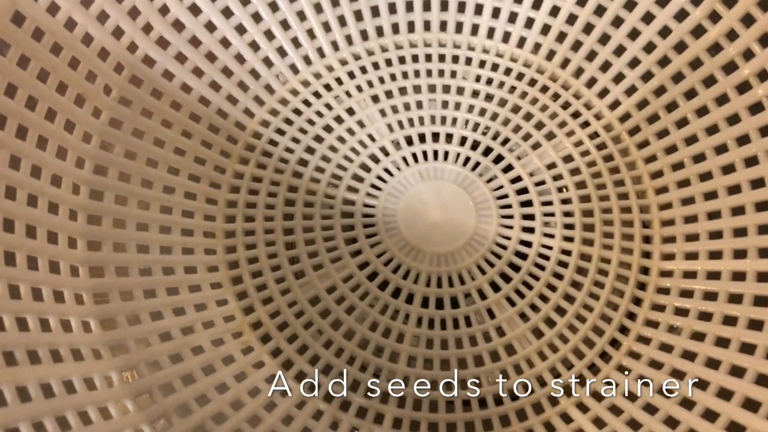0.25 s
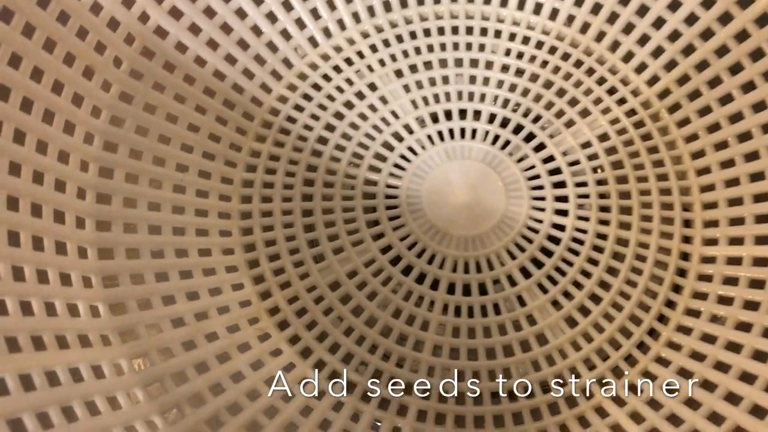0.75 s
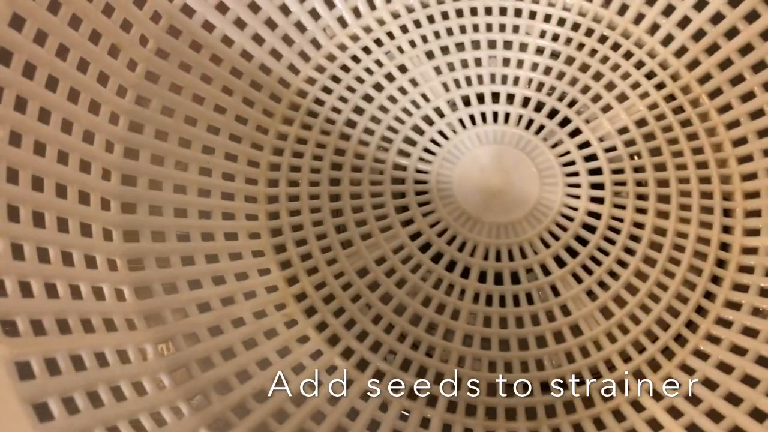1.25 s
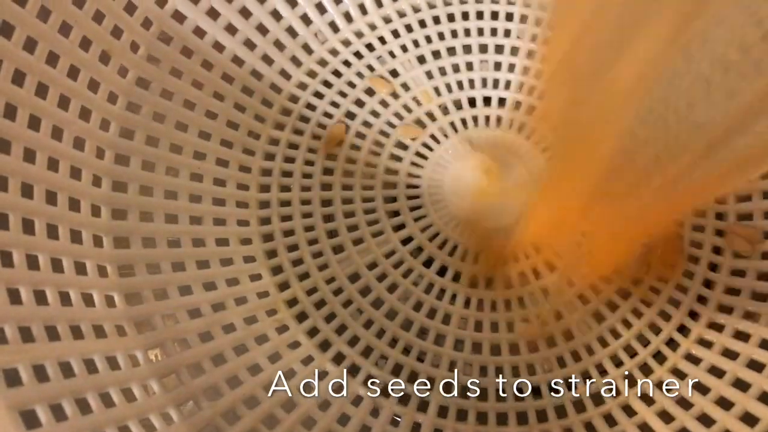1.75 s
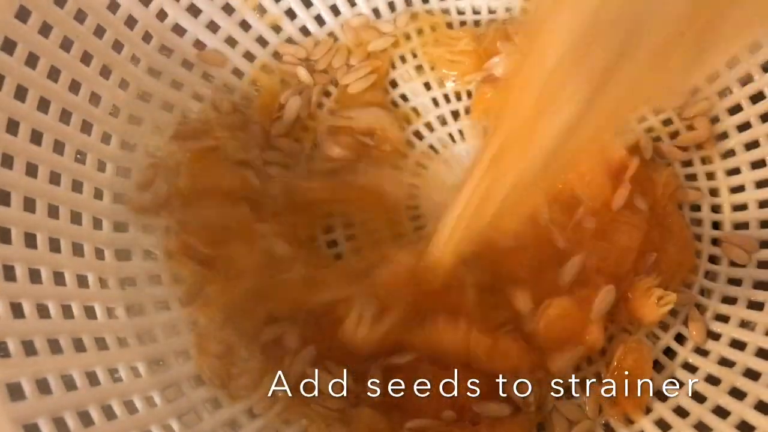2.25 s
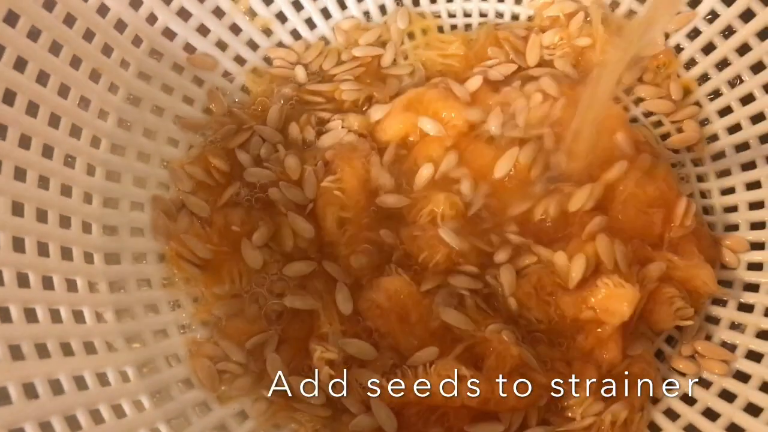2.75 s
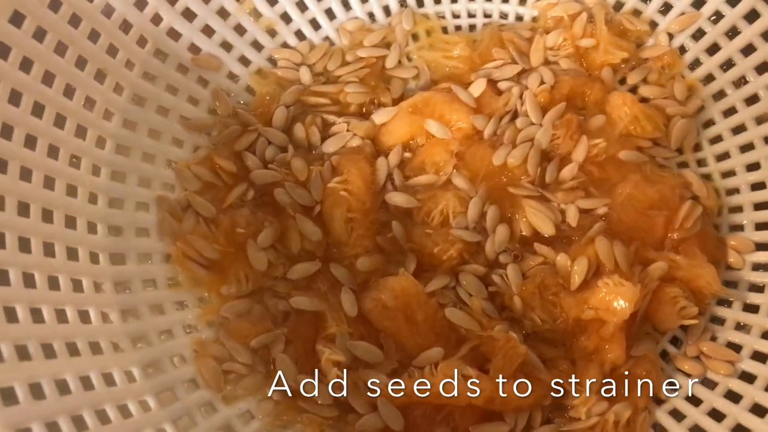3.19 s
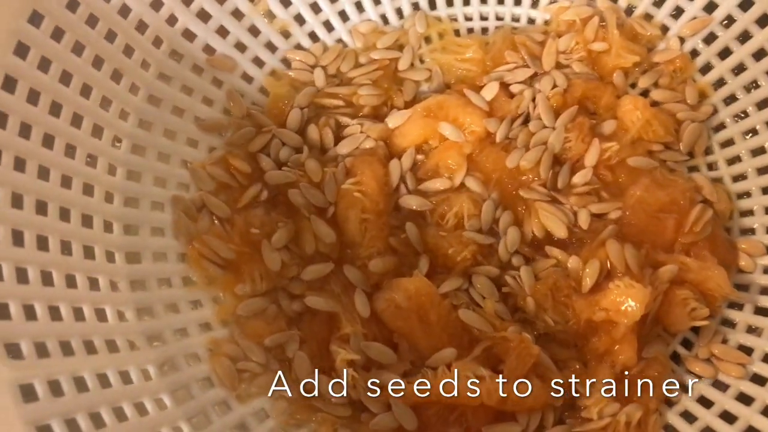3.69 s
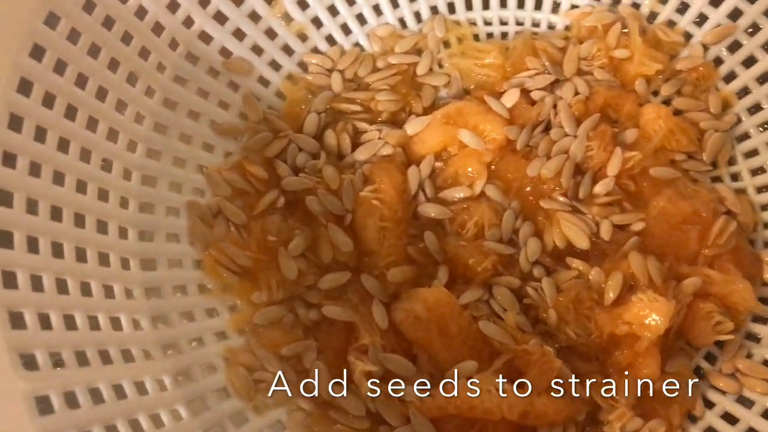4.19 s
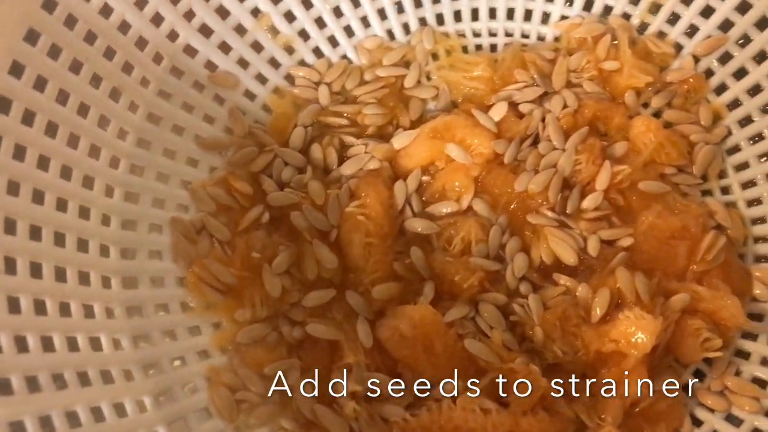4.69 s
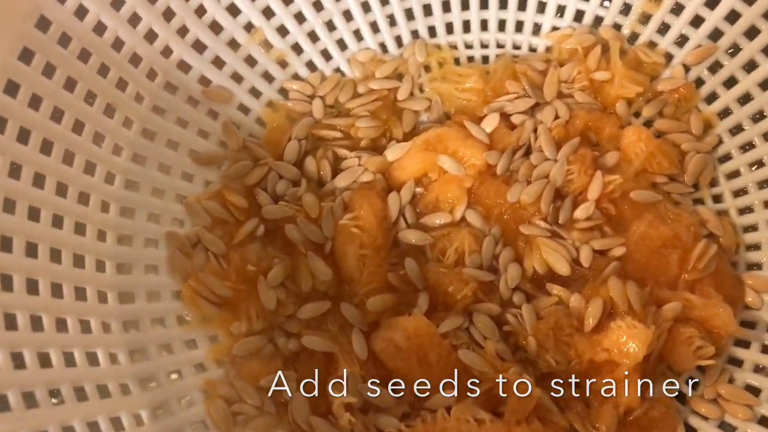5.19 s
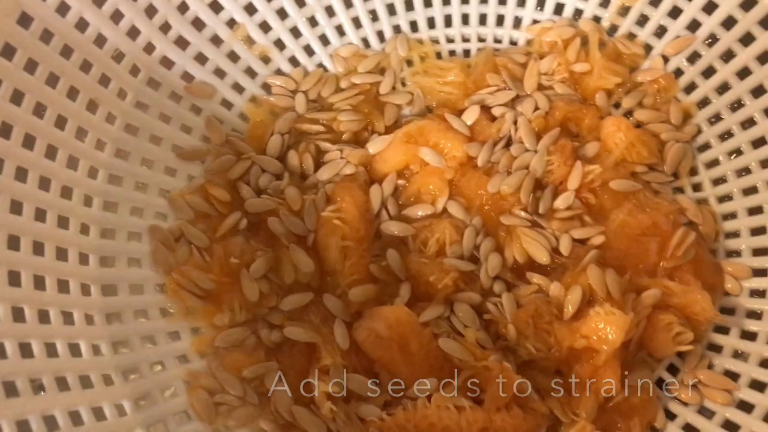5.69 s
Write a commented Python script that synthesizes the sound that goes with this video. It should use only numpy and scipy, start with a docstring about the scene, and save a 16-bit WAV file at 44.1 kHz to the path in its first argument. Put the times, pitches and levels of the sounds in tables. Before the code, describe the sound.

Close wet pour of pulp and seeds slopping into a strainer, draining to sparse ticking drips before loud clanks on a steel sink.

```python
"""At a steel kitchen sink, juice, pulp and seeds slop into a plastic strainer, close to the microphone.
Kitchenware bumps and slides on the sink before the pour and is set down hard after it: dying tones and noise.
The wet mass splats and crackles, made of noise bursts and tiny bubbles, over a gush and a low patter.
It thins out to drips, short dry noise bursts, in a quiet kitchen with soft air, a hum and a faint whine."""
import sys
import numpy as np
from scipy import signal
from scipy.fft import rfft, irfft
from scipy.io import wavfile
from scipy.ndimage import uniform_filter1d

SR = 44100
rng = np.random.default_rng(int(sys.argv[2]) if len(sys.argv) > 2 else 0)


def generate_wav(sig):
    """Save sig (samples, or channels by samples) to the path in sys.argv[1] as 16-bit PCM at SR."""
    pcm = np.round(np.clip(np.atleast_2d(sig).T, -1, 1) * 32767).astype(np.int16)
    wavfile.write(sys.argv[1], SR, pcm)


N = 261954
T = np.arange(N) / SR  # time of every sample, in seconds

# Levels in the tables are relative: the functions scale and filter them further.
# Colour of the room air: pitch_hz, level_db (per Hz)
AIR_COLOUR = [(25, -14.5), (45, 1.5), (70, -1), (115, 0.5), (160, -10), (280, -13.5), (450, -21.5),
              (1000, -22), (2000, -28), (8000, -34), (16000, -36.5)]
# Loudness of the hum over time: start_s, level_db
HUM_LEVEL = [(0, -59), (0.35, -61), (0.75, -59.5), (0.95, -80), (1.5, -69.5), (2, -78.5), (5.9, -60)]
# Blows on the sink: start_s, clack_db (bright), middle_db, boom_db (low), tick_db (contact)
KNOCKS = [(0.032, -48, -56, -39.5, -63), (0.051, -44, -50, -36.5, -53), (0.126, -46, -54, -43, -75),
          (0.19, -34.5, -45, -37, -49), (4.7056, -5.5, -28, -21, -22.5), (4.775, -19.5, -35, -28.5, -49),
          (5.0791, -24.5, -34.5, -27, -60), (5.1302, -37.5, -45, -38, -75),
          (5.226, -21.5, -19.5, -9.5, -36), (5.2692, -33.5, -32, -21, -50),
          (5.4232, -32.5, -41, -25.5, -82), (5.5923, -18, -23, -14, -27)]
# Ringing tones of the steel sink: pitch_hz, level_db, t60_s (time to fall by 60 dB)
SINK_MODES = [(92, -11.5, 0.093), (121.8, 3.5, 0.17), (140, -2.5, 0.072), (164.3, 3, 0.046),
              (228, -22, 0.62), (259, -17, 0.3), (278.5, -1, 0.32), (357.7, -14, 0.28), (400.5, -24, 0.8),
              (443, -2, 0.041), (523.3, -14.5, 0.31), (691, -4.5, 0.25), (745, -3.5, 0.29),
              (783, -22, 0.33), (853, -2.5, 0.1), (942, -7.5, 0.26), (1160, -12.5, 0.39),
              (1300, -19, 0.058), (1655, -24, 0.33), (1977, -2.5, 0.071), (3100, -11.5, 0.076),
              (3650, -15, 0.2), (6350, -61, 0.135)]
# Bright tones that a hard, metallic contact wakes: pitch_hz, level_db, t60_s
RIM_MODES = [(850, -26, 0.99), (1087, -19.5, .9), (1150, -23, 1), (1267, -7.5, 0.25), (1470, -11.5, 0.26),
             (1950, -20.5, 0.32), (2090, -16, .35), (2150, -25, 0.88), (3030, -26, 0.55),
             (3430, -20.5, 0.12), (3670, -18.5, 0.12), (4340, 1.5, 0.11), (4020, 13.5, 0.028),
             (4400, -24, 0.56), (6020, -18.5, 0.31), (6290, -4, 0.12), (7150, -26.5, 0.15),
             (8900, -4.5, 0.095)]
# Colour of the crowd of weaker sink tones: pitch_hz, level_db (per Hz)
CROWD_COLOUR = [(50, -74), (110, 9.5), (280, 5), (330, -19), (600, 4), (900, 8.5), (2000, -4),
                (4200, -17.5), (5200, -18), (9500, -25.5), (11000, -46), (16000, -23.5)]
# How long that crowd rings: pitch_hz, t60_s
CROWD_T60 = [(100, 0.58), (500, 0.38), (2000, 0.36), (5000, 0.18), (14000, 0.21)]
# Slides on the steel, one list for each: start_s, level_db
SLIDES = [
    [(0.02, -51), (0.05, -38.5), (0.12, -37.5), (0.16, -35), (0.195, -35), (0.24, -54)],
    [(5.33, -51), (5.44, -35.5), (5.5, -37), (5.58, -30.5), (5.62, -35)],
]
# Dull plops: start_s, level_db, pitch_factor (times), tick_db (relative to the plop)
PLOPS = [(0.8742, 2, 0.95, -21.5), (1.056, -27, 0.44, -36)]
# Tones of a plop before its pitch factor: pitch_hz, level_db, t60_s
PLOP_MODES = [(450, -7.5, 0.035), (130.7, -34, 0.13), (248, -16.5, .045), (359, -19, 0.025),
              (492.4, -25, 0.041), (564, -41, 0.16), (698, -16, 0.021), (1120, -35.5, 0.033)]
# Colour of a plop's dull echo: pitch_hz, level_db (per Hz)
PLOP_ECHO_COLOUR = [(100, -12), (350, -0.5), (600, 2), (800, -11), (1200, -17), (1900, -23.5), (2350, -18),
                    (3000, -34), (12000, -66.5)]
# The clearest drops through the mesh: start_s, level_db (peak), pitch_hz
DRIPS = [(3.381, -31.5, 522), (3.488, -28, 1690), (3.55, -31, 11200), (3.704, -32.5, 2070),
         (3.827, -33, 13250), (4.049, -33, 3600), (4.249, -36, 1160), (4.283, -34.5, 6070),
         (4.355, -32, 1630), (4.41, -31.5, 690), (4.639, -35.5, 3410), (5.018, -39, 1100),
         (5.876, -40, 745)]
# Colour of a drip: pitch_hz, level_db (per Hz)
DRIP_COLOUR = [(200, -11.5), (800, 3), (2000, 4), (4500, 3.5), (9000, -7.5), (16000, -1.5)]
# Time span in which fainter drops fall while the pulp drains: start_s, end_s
DRAIN_SPAN = (3, 5.6)
# Hollow notes of the bowl: pitch_hz, level_db, t60_s
BOWL_MODES = [(574, -3.5, 0.095), (868, -7.5, .09), (1138, 3.5, 0.23), (1216, -1, 0.36)]
# Strength of the pour, with swells and surges, then a trickle: start_s, level_db
FLOW = [(1.73, -10), (1.8, -7), (1.86, -7), (1.9, -4), (2.2, 1), (2.32, -4), (2.4, -6.5), (2.5, -5),
        (2.55, -11), (2.61, -5), (2.73, -13), (2.88, -8), (3.06, -21.5), (3.3, -22), (3.45, -27),
        (3.66, -36), (4.68, -41)]
# Heavy lumps landing on the strainer: start_s, level_db, pitch_hz
THUDS = [(1.731, -29.5, 255), (1.76, -27, 235), (1.824, -29.5, 215), (1.885, -22, 150), (1.92, -24.5, 110),
         (2.057, -33, 105), (3.115, -25, 260)]
# Colour of the seeds pattering and drumming on the bowl: pitch_hz, level_db (per Hz)
PATTER_COLOUR = [(50, -37.5), (95, 0.5), (150, -8.5), (185, -9.5), (260, -2), (300, -7.5), (350, -16),
                 (580, -15.5), (1500, -49)]
# Loudness of a soft clot sliding down: start_s, level_db
CLOT_LEVEL = [(3.715, -64), (3.738, -48), (3.745, -31), (3.762, -47.5), (3.8, -55), (3.85, -76)]
# Colour of the clot: pitch_hz, level_db (per Hz)
CLOT_COLOUR = [(50, -43.5), (130, -14), (280, 10.5), (400, -2.5), (620, 2.5), (1000, -13), (2200, -5),
               (5000, -14), (16000, -20.5)]
# Colour of the gushing liquid: pitch_hz, level_db (per Hz)
GUSH_COLOUR = [(300, -26.5), (450, -21), (580, -26), (700, -13.5), (900, -9), (1200, -6.5), (1430, -12.5),
               (1680, 0), (2800, -1), (3800, -4.5), (6000, -14)]
# Colour of the crackling seeds and films: pitch_hz, level_db (per Hz)
CRACKLE_COLOUR = [(1500, -10.5), (3000, -8), (4000, -2), (4900, -7), (6000, 1), (7500, -6), (9000, 0),
                  (10500, -10), (12500, -1), (16000, -14.5)]
# The biggest bursting pockets of air: start_s, level_db (peak), pitch_hz, t60_s
SPLATS = [(1.7303, -13, 9560, 0.13), (1.7587, 1.5, 3920, 0.017), (1.8687, -3, 6840, 0.038),
          (1.8823, -3, 2337, 0.064), (1.9396, 0, 2934, 0.053), (1.9594, 1.5, 3590, 0.049),
          (2.0396, -5.5, 4310, 0.034), (2.0986, -7.5, 4180, 0.021), (2.1934, -8, 6540, 0.023),
          (2.2551, -3, 5600, 0.019), (2.2872, -9, 3800, 0.01), (2.316, -5, 8970, 0.036),
          (2.3539, -0.5, 8960, 0.01), (2.4472, -8.5, 6730, 0.014), (2.5137, -8, 3230, 0.026),
          (2.563, -10.5, 6560, .02), (2.6, -7.5, 4500, 0.032), (2.6365, -6.5, 6640, 0.021),
          (2.835, -10.5, 6400, 0.0095), (2.8597, -8, 5550, 0.013), (2.8765, -5.5, 5980, 0.038),
          (2.9068, -5, 6330, 0.026), (2.9385, -10, 2565, 0.025), (2.9786, -14, 5900, .034),
          (3.0165, -12, 5820, 0.019), (3.0657, -18.5, 6500, 0.025), (3.1129, -12, 13500, .03),
          (3.1238, -13, 8160, 0.015), (3.1808, -5.5, 4130, .007), (3.2055, -12.5, 8770, 0.023)]
# Colour of a splat: pitch_hz, level_db (per Hz)
SPLAT_COLOUR = [(200, -24.5), (400, -32), (700, -1), (1150, -1.5), (1450, -5.5), (2500, -1.5), (7000, -2.5),
                (11000, -5.5), (16000, -8)]

EDGE_HZ = 16100  # upper limit of the microphone's range
AIR_DB = -62.5
# Each voice of the pour: level at 0 dB of flow, and dB lost for each dB less of flow
CRACKLE_DB, CRACKLE_SLOPE = -30, 1.015
GUSH_DB, GUSH_SLOPE = -30, 1.296
PATTER_DB, PATTER_SLOPE = -44, 0.57
DRUM_DB, DRUM_SLOPE = -44.5, 0.62
DRUM_HZ = 182  # the drumming lies below this pitch, the patter above it
GLUG_HZ, GLUG_DB = 6.5, 3  # the thick mass comes unevenly: fastest wavering, and its typical size
THUD_T60_S, THUD_PATTER_DB = 0.093, -15  # a lump dies away quickly; its seeds are quieter by this much
# Smaller pockets of air: how many, level at 0 dB of flow, its scatter, dB lost for each dB less of flow
POCKETS_PER_S, POCKET_DB, POCKET_SCATTER_DB, POCKET_SLOPE = 55, -12.5, 3, 0.5
# Their pitch at 0 dB of flow, its scatter, its rise as the flow thins, and their dying time
POCKET_HZ, POCKET_OCTAVES, POCKET_OCTAVES_PER_DB, POCKET_T60_S = 4360, 0.59, 0.06, 0.018
# Fainter drops: how many, level and its scatter, pitch and its scatter
DROPS_PER_S, DROP_DB, DROP_SCATTER_DB = 12, -43, 2.5
DROP_HZ, DROP_OCTAVES = 3456, 0.46
DRIP_T60_S = 0.019  # for clear and faint drops alike


def amp(db):
    """Turns decibels into a gain."""
    return 10 ** (np.asarray(db) / 20)


def unit(x):
    """Scales a sound to an average (rms) level of 1."""
    return x / np.sqrt(np.mean(x ** 2) + 1e-20)


def read(points, hz):
    """Reads a table between its points, with pitch spaced by ratio as we hear it."""
    f, value = np.transpose(points)
    return np.interp(np.log(hz + 1), np.log(f + 1), value)


def level(rows, column=1):
    """Turns a dB curve into a gain over time, practically silent outside its span."""
    rows = np.array(rows)
    return amp(np.interp(T, rows[:, 0], rows[:, column], left=-150, right=-150))


def add(mix, s, sound):
    """Mixes a sound in at time s."""
    part = mix[round(s * SR):][:len(sound)]
    part += sound[:len(part)]


def colour(x, points, size=4096):
    """Gives a sound the tone colour of a table, with no ringing ahead, so that clicks stay sharp."""
    log_gain = np.log(amp(read(points, abs(np.fft.fftfreq(size, 1 / SR)))))
    taps = np.fft.ifft(np.exp(np.conj(signal.hilbert(log_gain)))).real
    return signal.fftconvolve(x, taps[:size // 2])[:len(x)]


def band(x, kind, hz, order=3):
    """Keeps the lows, the highs or a band between two pitches."""
    return signal.sosfilt(signal.butter(order, hz, kind, fs=SR, output="sos"), x)


def dying(t, t60):
    """Dies away smoothly, falling by 60 dB in t60 seconds."""
    return np.exp(-np.log(1000) * t / max(abs(t60), 1e-4))


def ring(modes, t, pitch=1, split=0):
    """Sum of dying tones; an uneven shape splits each into a close pair that beats."""
    out = np.zeros(len(t))
    for k, (hz, db, t60) in enumerate(modes):
        turn = 2 * np.pi * hz * pitch * t
        twin = np.sin(turn * (1 + split * rng.standard_normal()))
        pair = (2 * np.sin(turn) + twin) / 3
        out += (-1) ** k * amp(db) * dying(t, t60) * pair
    return out


def diffuse(t60s, t, count=9):
    """Noise whose pitch bands die at their own speeds."""
    centres = np.geomspace(60, 15000, count)
    hz = np.fft.rfftfreq(len(t), 1 / SR)
    spectrum = rfft(rng.standard_normal(len(t)))
    out = np.zeros(len(t))
    for centre, share in zip(centres, np.eye(count)):
        one_band = irfft(spectrum * read(np.c_[centres, share], hz), len(t))
        out += one_band * dying(t, read(t60s, centre))
    return out


def clicks(per_s, spread_db):
    """Random clicks, mostly small and a few large."""
    place, size, side = rng.random((int(per_s * N / SR), 3)).T
    sizes = amp(spread_db * np.minimum(-np.log(1 - size), 4))
    return np.bincount((place * N).astype(int), sizes * np.sign(side - 0.5), N)


def steadied(x, size=2200):
    """Holds the short-term level near 1, leaving the fine grain."""
    power = uniform_filter1d(uniform_filter1d(x ** 2, size), size)
    return x / np.sqrt(abs(power) + 1e-12)


def moments(span, per_s, count=300):
    """Irregular moments through a span, each with two chance values: time, for its size, for its pitch."""
    times = span[0] + (np.arange(count) + rng.random(count)) / per_s
    chances = np.clip(rng.standard_normal((count, 2)), -2, 2)
    return np.c_[times, chances][times < span[1]]


def kitchen():
    """Soft room air, a low wavering hum and a very faint electrical whine."""
    air = amp(AIR_DB) * unit(colour(rng.standard_normal(N), AIR_COLOUR))
    waver = unit(band(rng.standard_normal(N), "low", 2.8, order=2))
    hum = level(HUM_LEVEL) * unit(np.sin(2 * np.pi * 62.8 * T + 0.37 * waver))
    whine = np.zeros(N)
    for k in range(2, 14):  # overtones of 1006.5 Hz, without the lowest one
        whine += np.sin(2 * np.pi * k * (1006.5 * T + rng.random())) / np.sqrt(k)
    return air + hum + amp(-80) * unit(whine)


def slides():
    """Something sticks and slips on the steel, and the clicks make the sink ring."""
    t = np.arange(SR // 2) / SR
    body = ring(SINK_MODES, t, split=0.02) + 2 * colour(diffuse(CROWD_T60, t), CROWD_COLOUR)
    # colour of the clicks: pitch_hz, level_db
    drive = colour(clicks(900, 6.2), [(100, 2), (300, 4.5), (450, -9.5), (700, -14.0), (1200, -12),
                                      (2000, -6.5), (5000, -5.5), (15000, -2)])
    scrape = steadied(signal.fftconvolve(drive, body)[:N])
    return scrape * sum(level(rows) for rows in SLIDES)


def sink():
    """Each blow ticks at the contact, rings the steel and booms the basin."""
    t, out = np.arange(SR * 3 // 5) / SR, np.zeros(N)
    early = slice(SR // 40)  # levels are set over this first part of the blow
    for s, clack_db, middle_db, boom_db, tick_db in KNOCKS:
        modes = ring(SINK_MODES, t, split=0.0175)
        rim = ring(RIM_MODES, t, split=0.0146)
        chatter = rng.standard_normal(len(t)) * dying(t, 0.083)
        crowd = colour(diffuse(CROWD_T60, t) + amp(15.5) * chatter, CROWD_COLOUR)
        body = modes + amp(-3) * crowd
        boom = band(body, "low", 510) * (1 - np.exp(-t / 0.0074))  # the basin takes a moment to swing
        middle = band(body, "band", [400, 2500])
        clack = band(body, "band", [2500, 9500])
        tick = band(chatter, "band", [8500, 12500], order=2)
        rim_gain = amp(-12.5 + 0.28 * clack_db)  # a harder clack wakes more of the rim
        blow = amp(boom_db - 2.5) * boom / boom[early].std()
        blow += amp(middle_db - 1) * middle / middle[early].std()
        blow += amp(clack_db - 3) * (clack / abs(clack).max() + rim_gain * rim)
        blow += amp(tick_db - 15) * tick / tick[early].std()
        add(out, s, blow * (1 - np.exp(-t / 0.00049)))  # contact builds up over about a millisecond
    return out


def plops():
    """A light tick, then a heavily damped hollow note and its dull echo."""
    t, out = np.arange(SR // 4) / SR, np.zeros(N)
    for s, db, pitch, tick_db in PLOPS:
        note = ring(PLOP_MODES, t, pitch) * (1 - np.exp(-(t / 0.0015) ** 2))
        tick = band(rng.standard_normal(len(t)), "low", 1700, order=1) * dying(t, 0.012)
        echo = unit(colour(rng.standard_normal(len(t)), PLOP_ECHO_COLOUR))
        echo = echo * (dying(t, 0.034) + amp(-22.5) * dying(t, 0.1414))
        add(out, s, amp(db) * (note + amp(tick_db) * tick + amp(-23) * echo))
    return out


def pops(rows, snap_colour, focus_db, note_db, width, attack, uneven_db):
    """A wet film snaps, loudest around the pitch of the air pocket behind it, which rings briefly."""
    t, out = np.arange(SR // 16) / SR, np.zeros(N)
    grid = np.geomspace(200, 16000, num=36)
    for s, db, hz, t60 in rows:
        octaves_off = np.minimum(abs(np.log2(grid / hz)), 2)
        uneven = uneven_db * rng.standard_normal(len(grid))
        own_colour = read(snap_colour, grid) - focus_db * octaves_off + uneven
        snap = unit(colour(rng.standard_normal(len(t)), np.c_[grid, own_colour]))
        # slow noise times a tone gives a blurred note
        blur = unit(band(rng.standard_normal(len(t)), "low", np.clip(hz * width, 10, SR / 4), order=2))
        pocket = blur * np.sin(2 * np.pi * hz * t)
        pop = (snap + amp(note_db) * pocket) * dying(t, t60) * (1 - np.exp(-t / attack))
        add(out, s, amp(db) * pop / (np.pi * pop[:SR // 250].std()))  # peaks stand about three times above rms
    return out


def drips():
    """Single drops land with a dry tick and hardly any note."""
    faint = []
    for s, size, pitch in moments(DRAIN_SPAN, DROPS_PER_S):
        faint.append((s, DROP_DB + DROP_SCATTER_DB * size, DROP_HZ * 2 ** (DROP_OCTAVES * pitch)))
    rows = [(*drop, DRIP_T60_S) for drop in [*DRIPS, *faint]]
    return amp(-3) * pops(rows, DRIP_COLOUR, focus_db=3, note_db=-9, width=0.15, attack=0.0001, uneven_db=1.5)


def bowl(x):
    """Short, dense echoes between the walls, and the bowl's hollow notes, which fade as pulp fills it."""
    t = np.arange(SR // 3) / SR
    # how long the echoes last: pitch_hz, t60_s
    tail = diffuse([(200, 0.17), (1500, 0.037), (5000, 0.1), (14000, 0.041)], t)
    tail = tail * (1 - np.exp(-t / 0.00084))
    notes = ring(BOWL_MODES, t, split=0.033)
    emptiness = amp(np.interp(T, [1.8, 2.2], [-13, -26]))
    echoes = signal.fftconvolve(x, tail / np.linalg.norm(tail))[:N]
    hollow = signal.fftconvolve(x * emptiness, notes / np.linalg.norm(notes))[:N]
    return x + amp(-10) * echoes + hollow


def following(db, slope):
    """Gain of one voice of the pour: it follows the flow and glugs by chance."""
    glug = unit(band(rng.standard_normal(N), "low", GLUG_HZ, order=2))
    return amp(db + GLUG_DB * glug) * level(FLOW) ** slope


def thuds():
    """Lumps land and the strainer gives a short, soft, low note."""
    t, out = np.arange(SR // 4) / SR, np.zeros(N)
    for s, db, hz in THUDS:
        add(out, s, ring([(hz, db, THUD_T60_S)], t) * (1 - np.exp(-t / 0.005)))
    return out


def patter():
    """Seeds patter on the bowl, more after each lump; the weight of the flow drums lower down."""
    taps = steadied(colour(clicks(400, 3.4), PATTER_COLOUR))
    landings = np.zeros(N)
    for s, db, hz in THUDS:
        landings += amp(db + THUD_PATTER_DB) * (T > s) * dying(abs(T - s), 0.22)
    seeds = band(taps, "high", DRUM_HZ) * (following(PATTER_DB, PATTER_SLOPE) + landings)
    drumming = band(taps, "low", DRUM_HZ) * following(DRUM_DB, DRUM_SLOPE)
    return seeds + drumming


def bubbles(per_s, spread_db, cycles, low_hz, high_hz, count=28):
    """Tiny bubbles of many sizes, each ringing briefly with a rising pitch."""
    t, out = np.arange(SR // 40) / SR, np.zeros(N)
    for hz in np.geomspace(low_hz, min(high_hz, SR / 2.6), count):
        age = hz * t / cycles
        rise = 1 + 0.031 * np.minimum(age, 2)
        grain = hz * np.exp(-np.pi * age) * np.sin(2 * np.pi * hz * t * rise)
        out += signal.oaconvolve(clicks(per_s / count, spread_db), grain)[:N]
    return unit(out)


def pockets():
    """Small pockets of air burst at random: weaker and higher as the flow thins."""
    rows = []
    for s, size, pitch in moments((FLOW[0][0], DRAIN_SPAN[0]), POCKETS_PER_S):
        flow_db = np.interp(s, *np.transpose(FLOW))
        db = POCKET_DB + POCKET_SLOPE * flow_db + POCKET_SCATTER_DB * size
        hz = POCKET_HZ * 2 ** (POCKET_OCTAVES * pitch - POCKET_OCTAVES_PER_DB * flow_db)
        rows.append((s, db, min(hz, EDGE_HZ), POCKET_T60_S))
    return rows


def pulp():
    """Seeds and films crackle and splat, liquid gushes through the mesh, and its weight drums on the bowl."""
    flow = following(CRACKLE_DB, CRACKLE_SLOPE)
    flow = flow + amp(-72) * (T > FLOW[-1][0])  # the pulp goes on ticking faintly
    fizz = bubbles(2300, 4.0, 9.8, 2500, 16000) + amp(-1) * bubbles(300, 4.0, 16, 2500, 14000)
    crackle = steadied(colour(fizz, CRACKLE_COLOUR)) * flow
    churn = bubbles(2200, 2.7, 7, 400, 6000) + bubbles(260, 3.1, 21, 500, 4000)
    gush = steadied(colour(churn, GUSH_COLOUR)) * following(GUSH_DB, GUSH_SLOPE)
    clot = steadied(colour(clicks(3600, 1.2), CLOT_COLOUR)) * level(CLOT_LEVEL)
    splats = pops([*SPLATS, *pockets()], SPLAT_COLOUR,
                  focus_db=5.5, note_db=1, width=0.11, attack=0.0005, uneven_db=3)
    return crackle + gush + patter() + thuds() + clot + amp(-4.5) * splats


def scene():
    """Everything at one close microphone; half of the drips' sound passes through the bowl."""
    half_drips = drips() / 2
    pour = bowl(pulp() + half_drips)
    return (kitchen() + slides() + sink() + plops() + half_drips + pour)[None]


def record(dry):
    """The microphone loses the deepest bass, clips at full scale and cuts the highest treble."""
    heard = np.clip(band(dry, "high", 34, order=2), -1, 1)
    treble_cut = signal.firwin(511, EDGE_HZ, window=("kaiser", 9), fs=SR)
    return signal.oaconvolve(heard, treble_cut[None], "same")


dry = scene()
out = record(dry)
generate_wav(out)
```